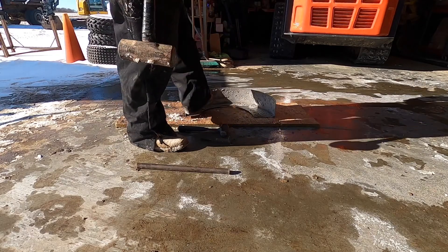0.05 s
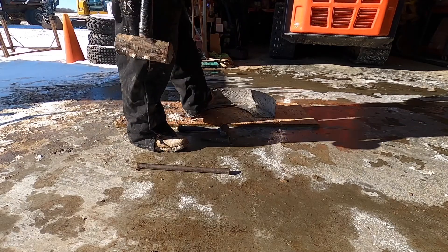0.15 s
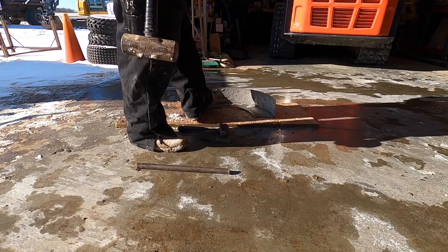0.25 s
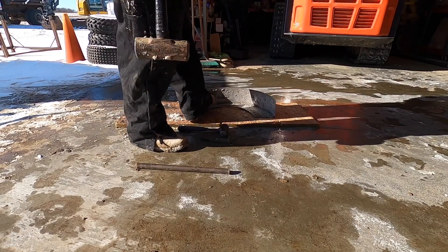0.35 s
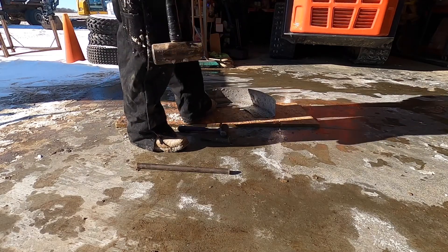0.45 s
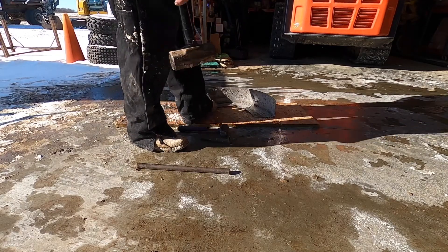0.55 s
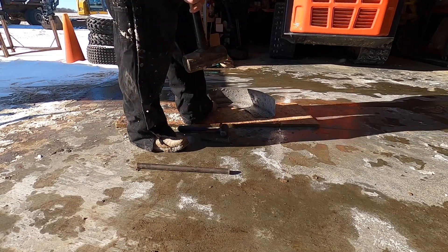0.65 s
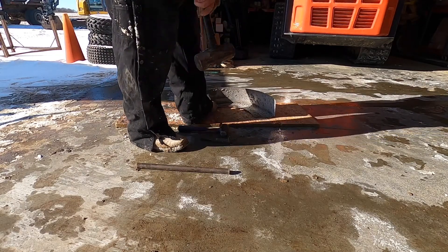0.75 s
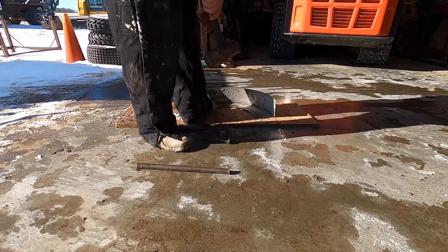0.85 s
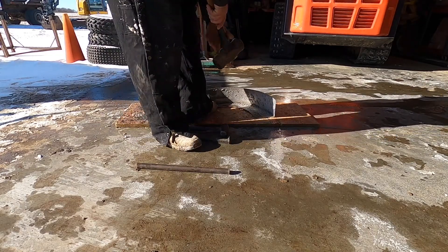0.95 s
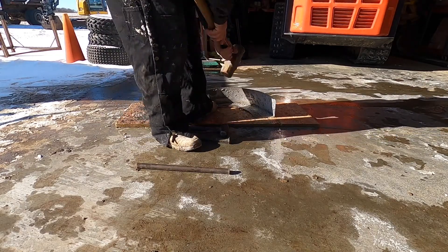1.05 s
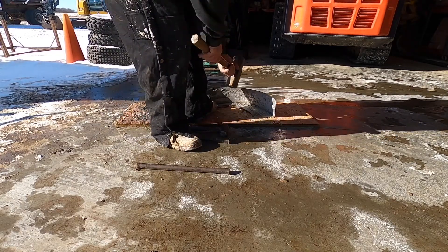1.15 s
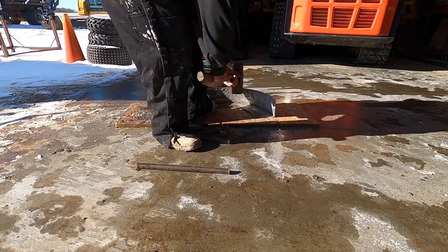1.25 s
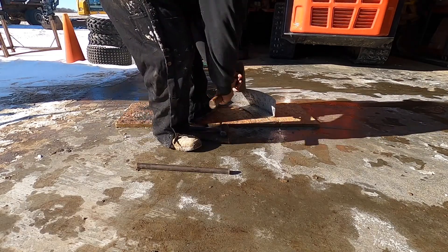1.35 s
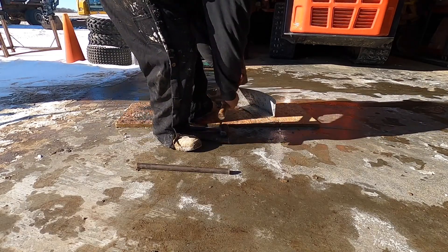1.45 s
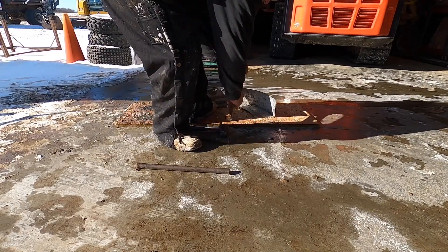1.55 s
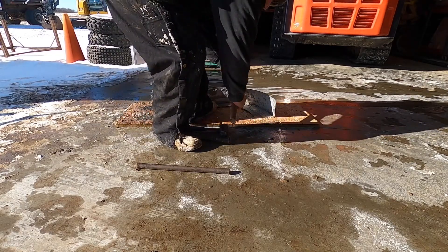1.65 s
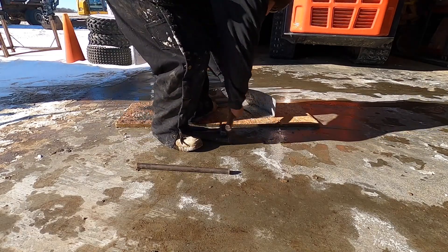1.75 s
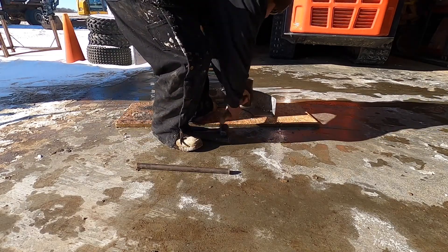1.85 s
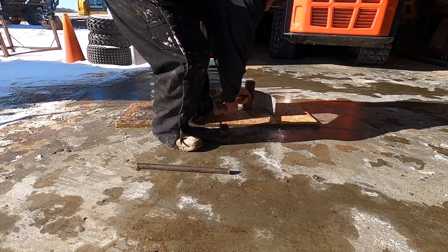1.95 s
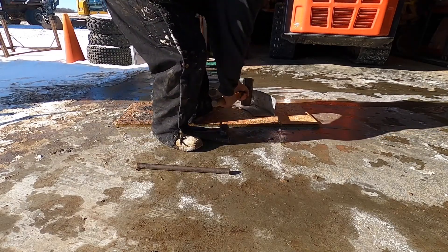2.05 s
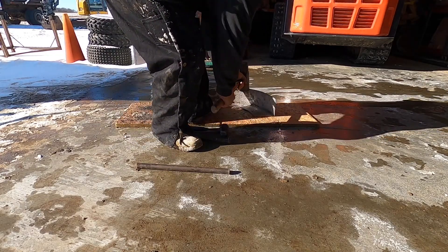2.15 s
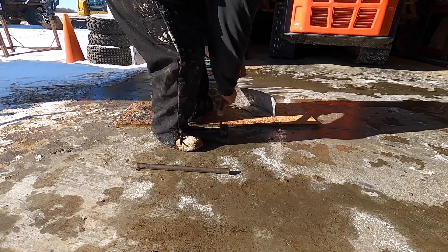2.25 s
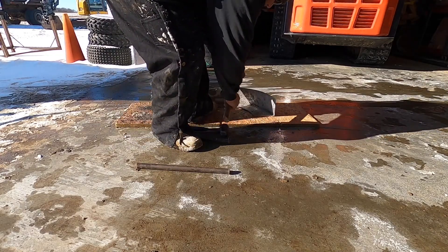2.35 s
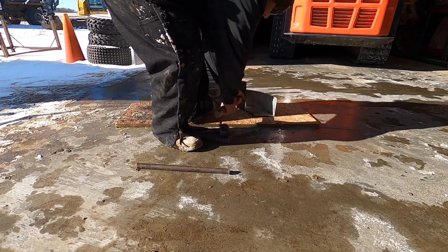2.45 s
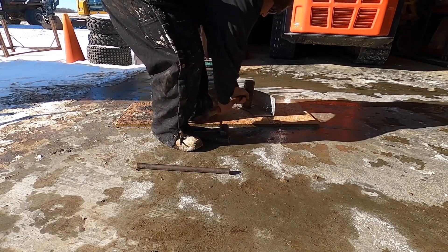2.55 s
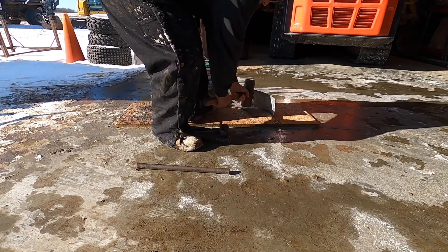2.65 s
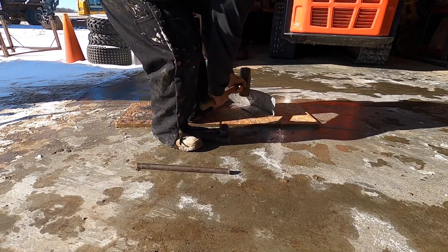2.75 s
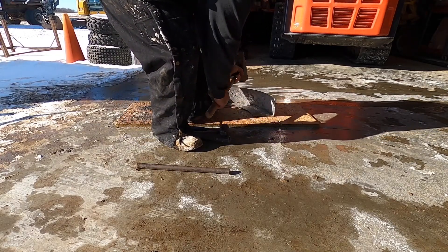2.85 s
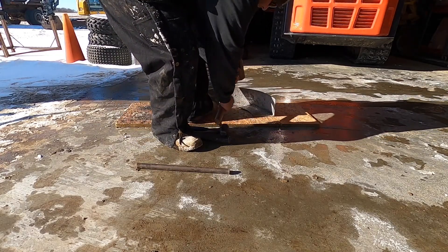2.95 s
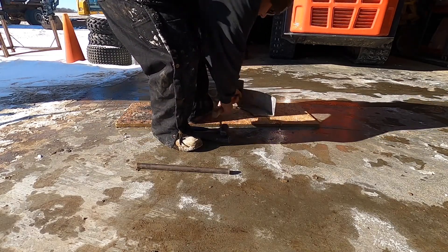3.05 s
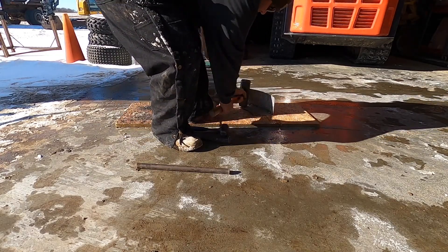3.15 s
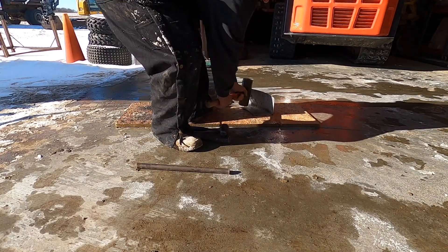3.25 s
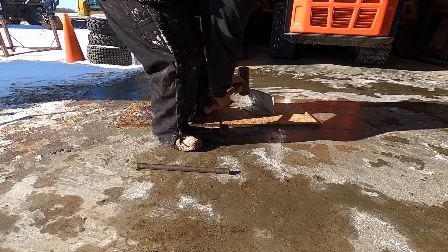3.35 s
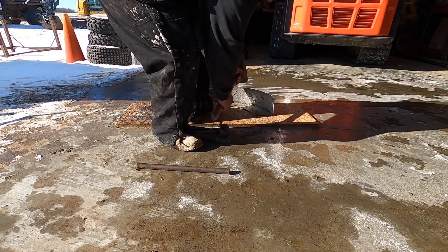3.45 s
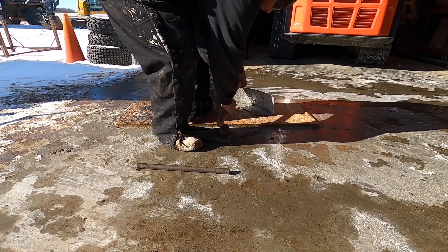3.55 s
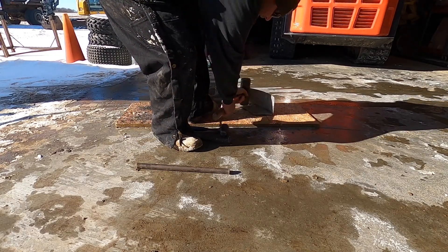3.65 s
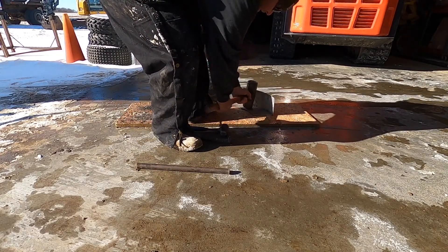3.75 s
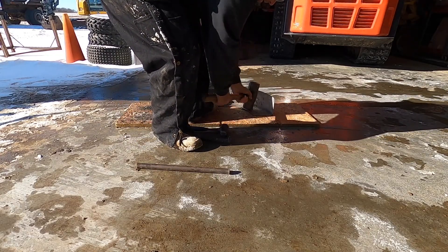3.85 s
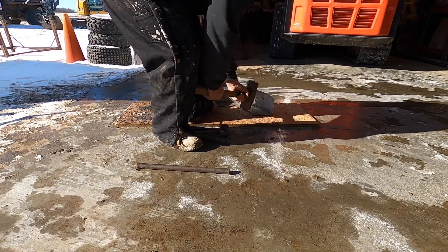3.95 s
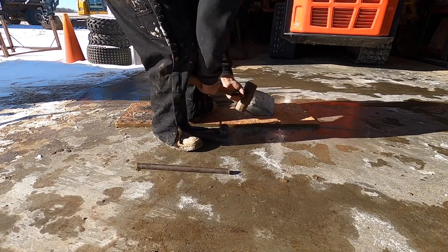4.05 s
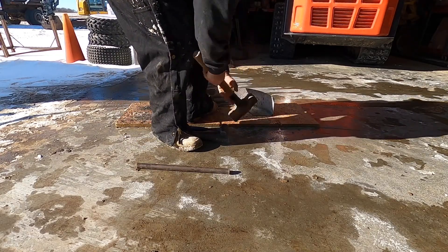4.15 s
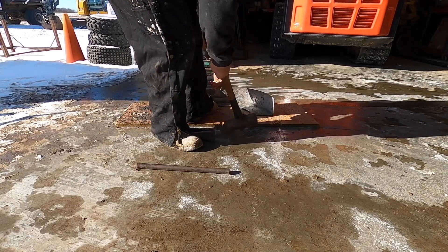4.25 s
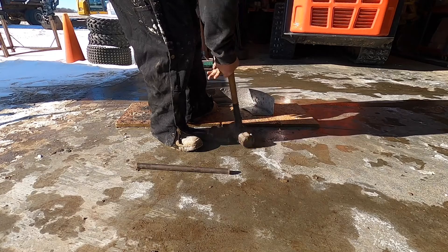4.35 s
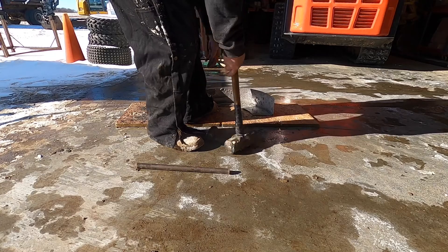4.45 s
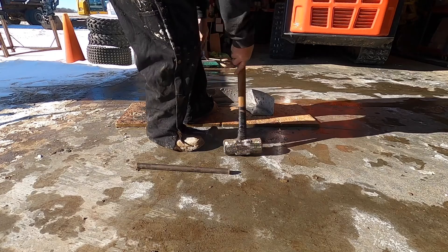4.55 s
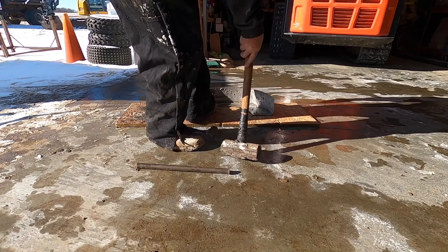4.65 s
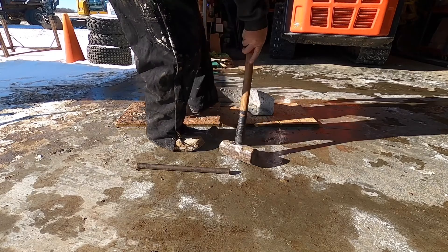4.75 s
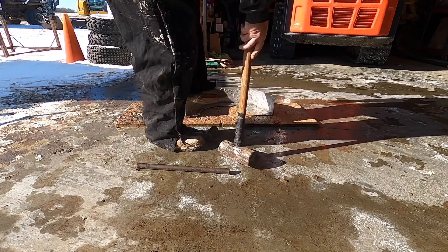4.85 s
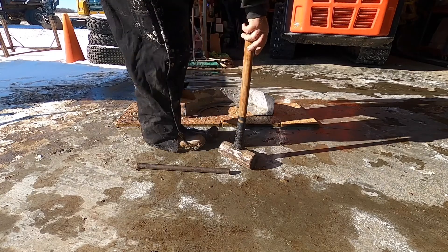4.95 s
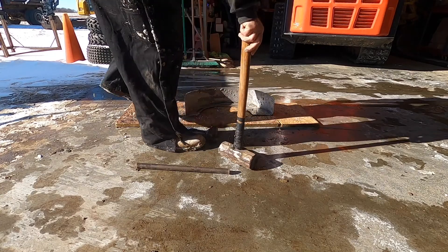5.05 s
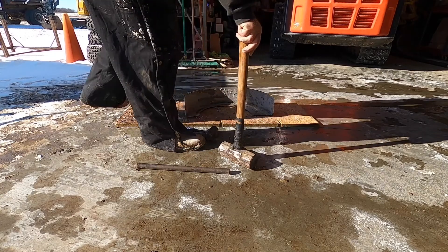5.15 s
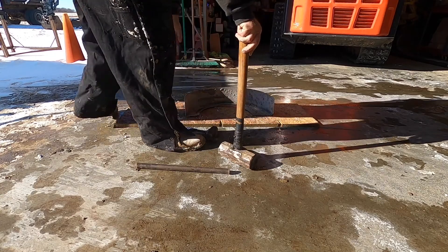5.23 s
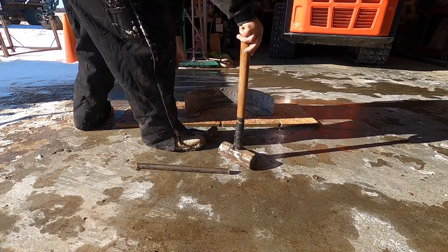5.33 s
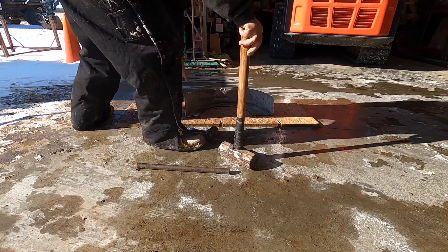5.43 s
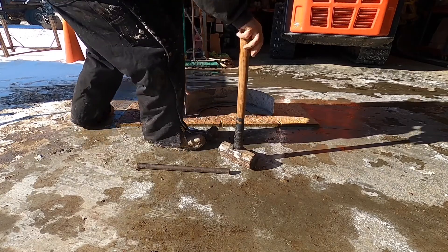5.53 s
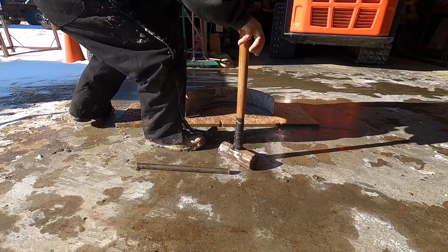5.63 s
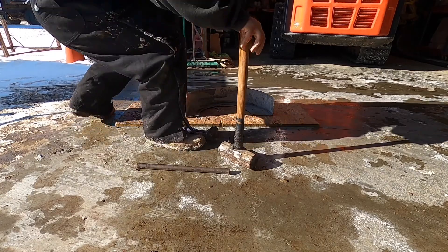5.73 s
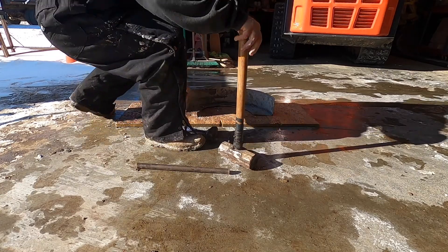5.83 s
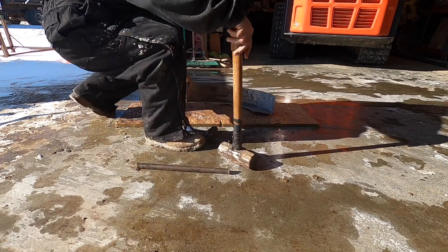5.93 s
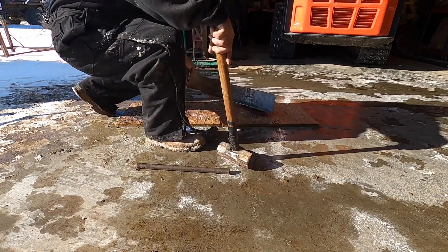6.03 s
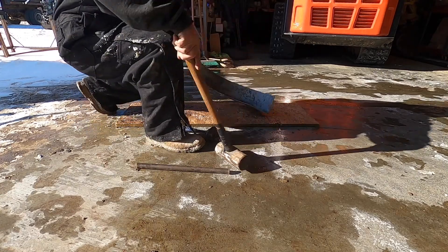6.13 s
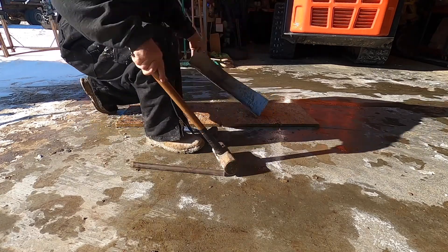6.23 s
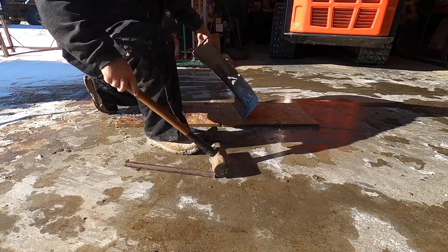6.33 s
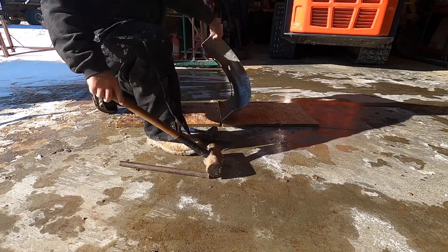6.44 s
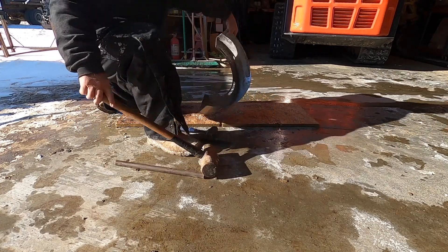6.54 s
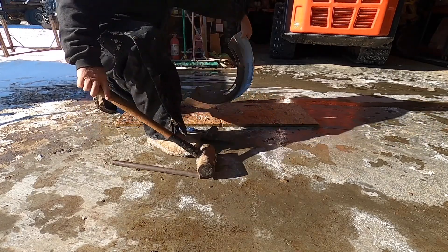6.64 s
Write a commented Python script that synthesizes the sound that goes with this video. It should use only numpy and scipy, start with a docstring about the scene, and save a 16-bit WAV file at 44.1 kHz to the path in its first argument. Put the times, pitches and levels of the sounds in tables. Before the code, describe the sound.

Outside an open shed, clothes rustle and boots scuff under low wind. Four heavy hammer blows land on a bent steel sheet lying on a plank, each a hard crack with woody thud, short metallic ring and noisy shed echo. A soft tap follows, then quiet shuffling. Near the end the hammer head strikes a steel bar with a bright ping, and the sheet clatters and scrapes off over grit. Close microphone, almost mono.

```python
"""Hammer on a bent steel sheet

Four heavy sledgehammer blows and a tap on a bent steel sheet on a plank: cracks of noise, plank and sheet modes.
An open shed answers with slowly dying noise, and a gain control flattens the loud parts and their tails.
Around them: rustling clothes and boots and wind (shaped noise), small knocks, clanks of the sheet,
a steel bar struck by the hammer head (dying sines) and the sheet dragged off over grit (ticks that ring it)."""
import sys
import numpy as np
from scipy import signal
from scipy.io import wavfile
from scipy.ndimage import uniform_filter1d

SR = 44100
rng = np.random.default_rng(int(sys.argv[2]) if len(sys.argv) > 2 else 0)


def inscribe(sig):
    """Save sig as 16-bit PCM at rate SR to the path in sys.argv[1].

    A 1-D sig is mono; a 2-D sig holds one channel per row.
    Samples are clipped to [-1, 1] before scaling.
    """
    pcm = np.round(np.clip(np.atleast_2d(sig).T, -1, 1) * 32767)
    wavfile.write(sys.argv[1], SR, pcm.astype(np.int16))


N = 295029


def gain_of(db):
    """Turns decibels into a factor for the wave."""
    return 10 ** (np.asarray(db) / 20)


def evened(x):
    """Scales a sound to an average (rms) level of 1."""
    return x / np.sqrt(np.mean(x ** 2) + 1e-20)


def read(points, hz):
    """Reads a table between its points; pitch is spaced by ratio, much as we hear it."""
    f, value = np.transpose(points)
    return np.interp(np.log(hz + 1), np.log(f + 1), value)


def add(mix, s, sound):
    """Mixes a sound in, starting at second s."""
    part = mix[round(s * SR):][:len(sound)]
    part += sound[:len(part)]


def band(x, hz, width):
    """Lets through a band around hz, width in Hz, like a simple resonance with a gain of 1 at its centre."""
    b, a = signal.iirpeak(hz, hz / width, SR)
    return signal.lfilter(b, a, x)


def dull(x, hz):
    """Distance and the microphone cover take off the treble above hz."""
    return signal.sosfilt(signal.butter(3, hz, fs=SR, output="sos"), x)


def ring(hz, db, t60, length_s, spread_db, damping):
    """Adds up dying sines, one per mode; a random spread stands for where the blow lands."""
    hz, t60 = np.array(hz, float)[:, None], np.array(t60)[:, None]
    t = np.arange(round(length_s * SR)) / SR
    db = np.array(db)[:, None] + spread_db * rng.standard_normal(hz.shape)
    fading = gain_of(db - 60 * damping * t / t60)  # t60: time to fall 60 dB when damping is 1
    modes = fading * np.sin(2 * np.pi * hz * t)
    return modes.sum(0) / np.linalg.norm(gain_of(db))


def hiss(level_db, size, patchy_db, flicker_db, count=N):
    """Noise from random short overlapping spectra; level_db(hz, t) is its colour over time, per Hz."""
    hop = size / 4
    frames, hz = count * 4 // size + 5, np.fft.rfftfreq(size, 1 / SR)[:, None]
    a, b, patches = rng.standard_normal((3, len(hz), frames))
    # smoothing makes neighbouring pitches and moments rise and fall together
    patches = uniform_filter1d(patches, size=9, axis=0)
    patches = evened(uniform_filter1d(patches, size=9, axis=1))
    flicker = rng.standard_normal(frames)
    db = level_db(hz, np.arange(frames) * hop / SR) + patchy_db * patches + flicker_db * flicker
    spectra = (a + 1j * b) * gain_of(db)
    return signal.istft(spectra, nperseg=size, noverlap=size * 3 // 4)[1][:count]


# how strong the wind is: t/s, level/dB
WIND_LEVEL = [(0, -40), (.28, -37), (.36, -48.5), (.78, -42), (.83, -55), (1.0, -37), (1.13, -54),
              (1.6, -69), (1.76, -45.5), (2.4, -60), (3.03, -42), (3.2, -48), (3.55, -42.5), (4.0, -40.5),
              (4.25, -50), (4.52, -36.5), (4.68, -50), (4.77, -42.5), (5.08, -51.5), (5.2, -72.5),
              (5.362, -39.5), (5.6, -79), (5.93, -57), (6.4, -62), (6.69, -45)]
# colour of the wind noise: f/Hz, relative level per Hz/dB
WIND_COLOUR = [(7.1, -30), (12, 2.5), (48, -1), (131, -8), (272, -23), (308, -28), (408, -35), (500, -35.5),
               (650, -49), (1100, -120)]


def wind():
    """Lumpy low pressure on the microphone, never quieter than a distant steady rumble."""
    s, db = np.transpose(WIND_LEVEL)
    noise = evened(hiss(lambda hz, t: read(WIND_COLOUR, hz), size=2048, patchy_db=3.0, flicker_db=4.0))
    gusts = gain_of(np.interp(np.arange(N) / SR, s, db))
    return noise * np.hypot(gusts, gain_of(-62))  # rumble level in dB


# colour of cloth noise: f/Hz, relative level per Hz/dB
CLOTH_COLOUR = [(120, -25.5), (200, 15), (297, 1), (319, -10), (402, 2), (641, -3.5), (934, -18),
                (1040, -3), (3780, -6), (6830, -15), (9600, -32), (12100, -31.5), (14500, -39.5)]
# each move of clothes and boots: loudest t/s, swell/s, fade/s, level/dB, treble fizz/dB, low body/dB
BODY_MOVES = [(.1, 0.11, 0.04, -56, 7, -25), (.29, 0.027, .12, -50, -4, -9), (.43, 0.13, 0.25, -42, -1, -4),
              (0.519, .03, 0.095, -44.5, -13, 6), (.885, 0.056, 0.032, -43, -1, -3),
              (0.974, .04, 0.066, -39, 3, -2), (1.19, 0.19, 0.14, -49, 10, -1),
              (1.7, 0.13, 0.34, -57.5, -2, -6), (4.69, .008, 0.15, -51.5, -11, -1),
              (4.91, .02, .06, -48, -13, 4), (4.989, 0.087, 0.073, -46, -9, 8.5),
              (5.29, 0.032, .07, -51.5, 7, 2.5), (5.45, 0.065, 0.11, -46.5, -3, 0.5),
              (5.72, 0.39, 0.12, -53.5, -3, -4), (5.855, .02, .09, -58, -5, 14),
              (5.9, 0.046, 0.23, -50, 0, 0.5), (6.22, 0.11, .6, -44, -2, 3)]


def rustle():
    """Cloth and boots rub: a hiss that swells and fades with each move, each with its own fizz and body."""
    still_db = -58.5  # faint hiss between moves, with a little more treble
    edge_db = -11.5  # a move is this far down one swell before and one fade after its loudest moment

    def colour(hz, t):
        high = np.clip(np.log2(hz / 4500 + 1e-9), 0, 1)
        low = np.clip(np.log2(1300 / (hz + 1)), 0, 1)
        power = gain_of(2 * (still_db + 3.3 * high)) + 0 * t
        for s, swell, fade, db, fizz_db, body_db in BODY_MOVES:
            away = np.where(t < s, (s - t) / swell, (t - s) / fade)
            loudness = gain_of(2 * (db + edge_db * away ** 1.36))
            power = power + loudness * gain_of(2 * (high * fizz_db + low * body_db))
        return read(CLOTH_COLOUR, hz) + 10 * np.log10(power)
    steady = np.linalg.norm(gain_of(read(CLOTH_COLOUR, np.fft.rfftfreq(256, 1 / SR))))
    return hiss(colour, size=256, patchy_db=2.0, flicker_db=0.8) / steady


# boots, handle and plank: t/s, scratch level/dB, thud level/dB, ground boom level/dB, scratch f/Hz, thud f/Hz
SMALL_KNOCKS = [(0.168, -57, -39, -40, 3900, 150), (.275, -67, -54, -30.5, 1440, 150),
                (.507, -28, -40, -43, 1840, 294), (0.887, -30.5, -39, -33, 2940, 254),
                (0.962, -36.5, -45, -43, 1790, 250), (.985, -34, -29.5, -39.5, 3760, 203),
                (1.461, -40, -65, -75, 3540, 430), (4.288, -41, -23, -49, 900, 298),
                (4.31, -53, -28, -44, 900, 300), (4.347, -41, -43, -54.5, 3180, 300),
                (4.385, -58, -26.5, -34.5, 900, 280), (4.683, -46, -60.5, -56.5, 4000, 388),
                (4.75, -55, -47.5, -37.5, 1900, 150), (4.905, -47, -48.5, -61, 1500, 393),
                (5.194, -48.5, -62, -66, 2620, 402), (5.293, -49, -32, -39, 1210, 329),
                (5.376, -47.5, -54, -37, 3600, 250), (5.402, -53, -45, -46, 1340, 300),
                (5.47, -57, -44, -42.5, 1720, 221), (5.845, -60, -50, -48, 1820, 198),
                (5.985, -46, -67, -70, 1900, 400), (6.045, -47, -63, -75, 2460, 400),
                (6.062, -49, -39, -49, 1250, 714), (6.244, -45, -25.5, -47, 1300, 190),
                (6.556, -44, -30, -37.5, 1600, 248), (6.578, -55, -28.5, -40, 1670, 250)]


def knocks():
    """Each knock is a scratch of noise, a dull thud and a low boom through the ground."""
    scratch_t60, thud_t60, boom_t60 = 0.048, 0.059, 0.15  # s to fade by 60 dB, before the bands add their own ring
    boom_hz = 45
    out, t = np.zeros(N), np.arange(6000) / SR
    rise = np.minimum(t / .0012, 1)

    def burst(noise, db, t60):
        shape = rise * gain_of(-60 * t / t60)
        shaped = noise * shape
        return gain_of(db) * shaped * np.linalg.norm(shape) / np.linalg.norm(shaped)
    for s, scratch_db, thud_db, boom_db, hz, thud_hz in SMALL_KNOCKS:
        scratch, thud, boom = rng.standard_normal((3, len(t)))
        scratch = band(scratch, hz, 0.73 * hz)
        thud = band(band(thud, thud_hz, 0.75 * thud_hz), thud_hz, 0.64 * thud_hz)
        boom = band(band(boom, boom_hz, 90), boom_hz, 90)
        add(out, s, burst(scratch, scratch_db, scratch_t60))
        add(out, s, burst(thud, thud_db, thud_t60))
        add(out, s, burst(boom, boom_db, boom_t60))
    return dull(out, hz=6500)


# how long the shed rings at each pitch, the time to fall 60 dB: f/Hz, t60/s
SHED_T60 = [(60, 0.47), (150, 0.42), (400, 0.89), (1000, 1.033), (2000, 0.94), (4000, 0.78), (8000, 0.76),
            (15000, .55)]


def shed(x):
    """Small sounds come back from the shed's walls as a dense tail of dying noise."""
    tail = hiss(lambda hz, t: -60 * t / read(SHED_T60, hz), size=256, patchy_db=2.5, flicker_db=2.5,
                count=2 * SR)
    tail = tail * np.clip((np.arange(2 * SR) / SR - .008) / 0.019, 0, 1)  # starts after 8 ms, full 19 ms later
    return signal.fftconvolve(x, tail / np.linalg.norm(tail))[:N]


# the bent sheet's modes: f/Hz
SHEET_MODES = [587, 727, 818, 845, 1071, 1136, 1260, 1384, 1408, 1594, 1733, 1824, 1868, 1915, 2040, 2153,
               2330, 2509, 2670, 2767, 3050, 3548, 3790, 3946, 4334, 4409, 4613, 4942, 5561, 5755, 6288]
# their relative strength, in the same order: level/dB
SHEET_LEVELS = [-8, -11.5, -2, -11, -14.5, -10.5, -4, -13.5, -11.5, -3, -4, -8.5, 3, -7, -10.5, -6.5, -13,
                -6.5, -12, -11, -20, -6, -5.5, -16.5, -15, -10, -26, -24.5, -20, -20, -14.5]
# how long they ring when damping is 1: f/Hz, t60/s
SHEET_RING_TIMES = [(700, 1), (1500, 0.68), (2000, 0.45), (4000, 0.11), (6500, 0.31)]


def sheet(damping, centre_hz, slope_db):
    """One ring of the bent sheet; modes lose slope_db for each octave away from the centre."""
    hz = np.array(SHEET_MODES)
    db = np.array(SHEET_LEVELS) - slope_db * abs(np.log2(hz / centre_hz))
    return ring(hz, db, read(SHEET_RING_TIMES, hz), .5, spread_db=0.0, damping=damping)


# bumps on the sheet's edge: t/s, level/dB, centre f/Hz, damping (a factor: higher dies faster)
EDGE_BUMPS = [(.52, -37, 870, 3.7), (4.262, -32.5, 1940, 1.2), (4.35, -38, 1950, 0.76),
              (4.384, -40, 1950, 1.2), (4.46, -45.5, 1910, 1.7), (5.71, -50, 2040, 1.5),
              (5.89, -52.5, 1800, 1.3), (5.98, -54, 1110, 0.36), (6.12, -52, 810, 3),
              (6.262, -25, 1420, 0.8), (6.3, -29.5, 2750, 0.98), (6.312, -26, 4350, 1.5),
              (6.335, -15.5, 4430, 1.8), (6.365, -20.5, 3900, 1.3), (6.38, -20, 2509, 1.97),
              (6.391, -16.5, 1830, 2.5), (6.393, -30, 806, 1.07), (6.432, -24, 3800, 1.4),
              (6.436, -27, 1560, 1.6)]


def clanks():
    """The sheet's edge is bumped and a few neighbouring modes ring, with a soft start."""
    out = np.zeros(N)
    for s, db, hz, damping in EDGE_BUMPS:
        sound = sheet(damping, hz, slope_db=45)
        soft_start = np.minimum(np.arange(len(sound)) / SR / 0.0043, 1)
        add(out, s, gain_of(db) * sound * soft_start)
    return out


# hits on the bar: t/s, ring level/dB, click level/dB
BAR_STRIKES = [(6.244, -11.5, -12), (6.266, -16, -36), (6.341, -39, -30.5), (6.37, -31.5, -24)]
# the bar touches the ground and loses ring: t/s, loss/dB
GROUND_TOUCH = (6.305, 10)
# the bar's bending modes: f/Hz
BAR_MODES = [646, 1739, 1802, 3353, 5377, 5420, 7865, 10621, 13380, 13670]
# their relative strength, in the same order: level/dB
BAR_LEVELS = [-18.5, -11, -23, 2, -21, -7, -19.5, -27, -44, -40]
# how long they ring: f/Hz, t60/s
BAR_RING_TIMES = [(600, 0.87), (3300, 0.6), (5400, 0.6), (8000, 0.58), (13500, 0.45)]


def bar():
    """A free steel bar is struck and bounces: each hit is a click and the bar's dying bending modes."""
    out = np.zeros(N)
    touch_s, loss_db = GROUND_TOUCH
    for s, ring_db, click_db in BAR_STRIKES:
        t60 = read(BAR_RING_TIMES, np.array(BAR_MODES))
        sound = gain_of(ring_db) * ring(BAR_MODES, BAR_LEVELS, t60, .5, spread_db=0, damping=1)
        t = s + np.arange(len(sound)) / SR
        if s < touch_s:
            sound *= gain_of(-loss_db * np.clip((t - touch_s) / 0.0036, 0, 1))
        click = dull(rng.standard_normal(400), hz=3000)
        click = click * gain_of(click_db - 60 * (t[:400] - s) / .02)
        add(out, s, sound)
        add(out, s, click)
    return out


# how loud the scrape is: t/s, level/dB
DRAG_LEVEL = [(6.19, -51.5), (6.25, -34.5), (6.3, -31.5), (6.34, -27), (6.395, -29), (6.444, -30),
              (6.5, -44.5), (6.6, -46.5)]
# colour of the grit noise: f/Hz, relative level per Hz/dB
GRIT_COLOUR = [(120, -47), (200, 6), (677, -9), (812, -4.5), (1400, 1.5), (1510, -12), (1880, 0),
               (2020, -9), (3890, -4.5), (15500, -48)]


def drag():
    """The sheet scrapes over grit: uneven ticks keep its modes ringing, with the grit's own noise."""
    s, db = np.transpose(DRAG_LEVEL)
    t = np.arange(s[0], s[-1], 1 / SR)
    strength = gain_of(2.4 * rng.exponential(1, len(t)))
    ticks = strength * (rng.random(len(t)) < 2500 / SR)  # about 2500 ticks a second
    widths = 4.3 / read(SHEET_RING_TIMES, np.array(SHEET_MODES))  # a long ring needs a narrow band
    rung = np.zeros(len(t))
    for hz, mode_db, width in zip(SHEET_MODES, SHEET_LEVELS, widths):
        pushed = band(ticks * rng.standard_normal(len(t)), hz, 400)
        rung += gain_of(mode_db) * evened(band(pushed, hz, width))
    grit = hiss(lambda hz, t: read(GRIT_COLOUR, hz), size=256, patchy_db=2.0, flicker_db=4.0, count=len(t))
    grit_db = 3 - 24 * (t - s[0])  # grit against ring: thins out by 24 dB a second as the sheet lifts
    sound = evened(rung) + gain_of(grit_db) * evened(grit)
    out = np.zeros(N)
    add(out, s[0], sound * gain_of(np.interp(t, s, db)) * signal.windows.tukey(len(t), .1))
    return out


# colour of the shed just after a blow: f/Hz, relative level per Hz/dB
ROAR_COLOUR = [(24, -41), (40, -12), (80, -10), (111, 15), (188, -3), (342, -6), (387, -11.5), (461, -6.5),
               (926, -11), (1770, -12), (2160, -16), (4350, -23), (7520, -39), (15500, -68)]
# part of the roar that is there at once, the rest builds up: f/Hz, share (0 to 1)
INSTANT_SHARE = [(200, 0.23), (2000, 0.41), (10000, 0.2)]
# time the far walls take to answer in full: f/Hz, build-up/s
WALL_BUILD_UP = [(500, .14), (2000, .18), (6000, .25)]


def roar():
    """The shed fills with each blow; every band dies at its own speed and the far walls answer late."""
    def colour(hz, t):
        bass = np.clip(np.log2(400 / (hz + 1)), 0, 1)
        treble = np.clip(np.log2(hz / 2000 + 1e-9), 0, 2)
        now = np.clip(read(INSTANT_SHARE, hz), 0, 1)
        power = 0
        for s, *_, db, bass_db, treble_db in HAMMER_BLOWS:
            started = np.clip((t - s - .008) / 0.001, 1e-9, 1)
            built = np.clip((t - s) / read(WALL_BUILD_UP, hz), 0, 1)
            fill = started * (now + (1 - now) * built)
            fading_db = db + bass * bass_db + treble * treble_db - 60 * abs(t - s) / read(SHED_T60, hz)
            power = power + fill * gain_of(2 * fading_db)
        return read(ROAR_COLOUR, hz) + 10 * np.log10(power)
    wash = evened(hiss(colour, size=512, patchy_db=1.5, flicker_db=1.16)) * gain_of(-27)
    out, t = np.zeros(N), np.arange(4000) / SR
    edges = [round(row[0] * SR) for row in HAMMER_BLOWS] + [N]
    for a, b in zip(edges, edges[1:]):  # each blow wakes its own crowd of close modes in the sheet
        crowd = rng.standard_normal(len(t)) * gain_of(-60 * t / 0.064)
        crowd = .36 * crowd / np.linalg.norm(crowd) + (t == 0)  # the single 1 passes the wash itself
        add(out, a / SR, signal.fftconvolve(wash[a:b], crowd))
    return out


# hammer on sheet: t/s, crack level/dB, plank thud level/dB, thud delay/s, thud centre f/Hz, crack f/Hz,
# upper crack level/dB, sheet ring level/dB, shed roar level/dB, roar bass/dB, roar treble/dB
HAMMER_BLOWS = [(1.854, 0, -2, 0.0049, 184, 1790, -6.5, -21, -10, 1.5, 1),
                (2.502, -6.5, -4.5, 0.0047, 420, 1770, -1.5, -20, -12, -4.5, 1),
                (3.103, -9.5, -3.5, 0.003, 517, 1820, -2, -14, -13, -1.5, 1.5),
                (3.677, -7, -5.5, 0.00517, 304, 1750, -4, -19.5, -12.5, -1, 2.5),
                (4.259, -17.5, -31, 0.00054, 300, 2000, -30, -38, -32.5, 1, -6.5)]
# the plank's modes: f/Hz, relative level/dB, t60/s
PLANK_MODES = [(65, -8, .2), (113, -1, .2), (159, 1, .22), (235, -6, .12), (297, -6, .12), (340, -6, .1),
               (450, -1, .08), (700, -5, .04)]
# a rasp swells into two of the blows: start t/s, end t/s, level/dB
RASP_SWELLS = [(1.822, 1.852, -15), (3.083, 3.101, -18)]


def blows():
    """A few ms of crack, the plank's thud a moment later, and the sheet ringing while held down."""
    out, t = np.zeros(N), np.arange(1200) / SR
    plank_hz, plank_level, plank_t60 = np.transpose(PLANK_MODES)
    for s, crack_db, thud_db, delay, thud_hz, hz, upper_db, ring_db, *_ in HAMMER_BLOWS:
        chatter = rng.standard_normal(len(t)) * gain_of(-60 * t / 0.021) * np.minimum(t / 0.00022, 1)
        upper = band(band(chatter, 2760, 2000), 3760, 1700) + 0.17 * band(chatter, 5700, 3500)
        main = band(band(chatter, hz, 1700), hz, 530)
        crack = main + gain_of(upper_db) * upper + 0.04 * band(chatter, 2400, 2000)
        onset = np.sqrt(np.mean(crack[:130] ** 2))  # loudness of the first 3 ms
        add(out, s, gain_of(crack_db) * crack / onset)
        plank_db = plank_level - 5 * abs(np.log2(plank_hz / thud_hz))  # where it lands favours some modes
        thud = ring(plank_hz, plank_db, plank_t60, 0.29, spread_db=1.5, damping=1)
        add(out, s + delay, gain_of(thud_db) * thud)
        add(out, s, gain_of(ring_db) * sheet(damping=1.4, centre_hz=1700, slope_db=2.0))
    for start, end, db in RASP_SWELLS:
        rise = np.linspace(.05, 1, round((end - start) * SR))
        grit = rng.standard_normal(len(rise))
        rasp = band(band(grit, 2460, 2700), 2860, 2100) + 0.77 * band(grit, 620, 1100)
        add(out, start, gain_of(db) * rise * evened(rasp))
    # the blows carry no deep bass
    out = signal.sosfilt(signal.butter(2, 70, "high", fs=SR, output="sos"), out)
    return dull(out, hz=5360)


# how much the two channels differ: f/Hz, side level against middle/dB
STEREO_SIDE = [(60, -38), (300, -43), (2000, -39), (6000, -29), (10000, -19.5), (11500, 0), (15000, -1)]


def scene():
    """Two channels: nearly the same sound, a little unlike in the treble."""
    small = knocks() + clanks() + bar() + drag()
    mid = blows() + roar() + small + gain_of(-16.0) * shed(small) + rustle() + wind()
    hz, _, z = signal.stft(mid, SR, nperseg=512)
    turn = np.exp(2j * np.pi * rng.random(z.shape))  # random phases make the side unlike the middle
    side_spectra = z * turn * gain_of(read(STEREO_SIDE, hz))[:, None]
    side = signal.istft(side_spectra, SR, nperseg=512)[1][:N]
    return np.array([mid + side, mid - side])


def record(dry):
    """Gain control falls within ms of a blow and recovers slowly; loud peaks clip softly; then the band limit."""
    power = signal.lfilter([.004], [1, -.996], (dry ** 2).mean(0))
    fall = np.arange(N) * 60. / SR  # the held level recovers by 60 dB a second
    held_db = np.maximum.accumulate(10 * np.log10(power + 1e-12) + fall) - fall
    over_db = held_db + 24  # the control acts above -24 dB
    cut_db = signal.lfilter([.003], [1, -.997], 0.37 * np.maximum(over_db, 0))
    clipped = np.tanh(dry / gain_of(cut_db))
    low_pass = signal.firwin(511, 15700, window=("kaiser", 9), fs=SR)  # top of the band in Hz
    return signal.oaconvolve(clipped, low_pass[None], "same")


dry = scene()
out = record(dry)
inscribe(out)
```